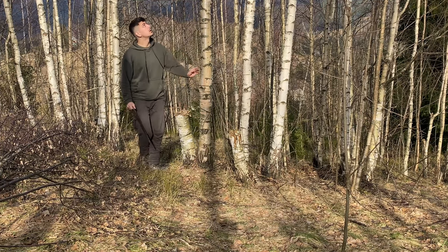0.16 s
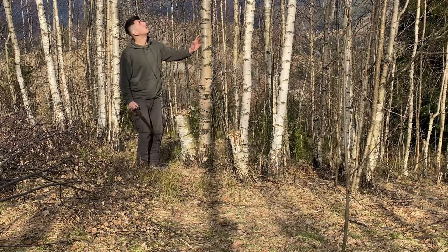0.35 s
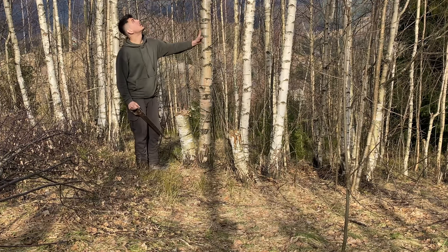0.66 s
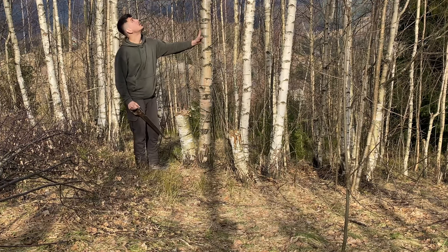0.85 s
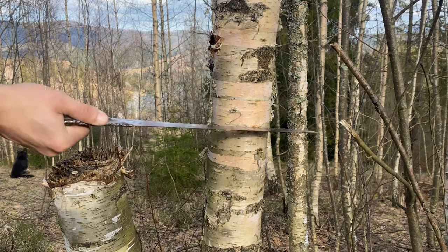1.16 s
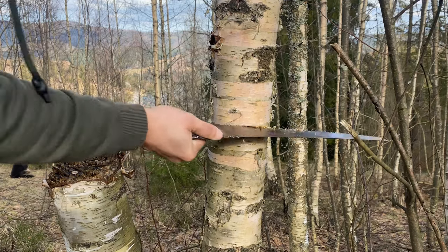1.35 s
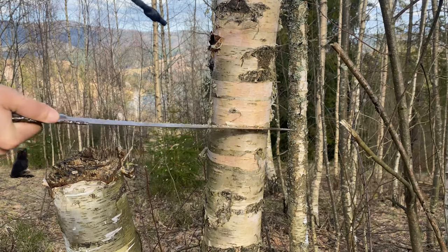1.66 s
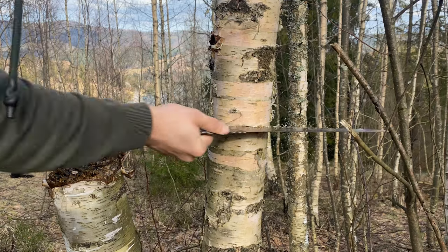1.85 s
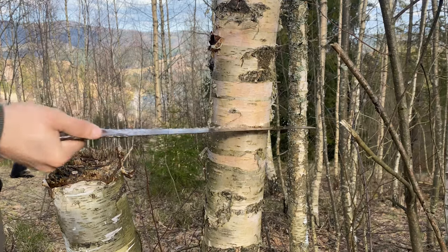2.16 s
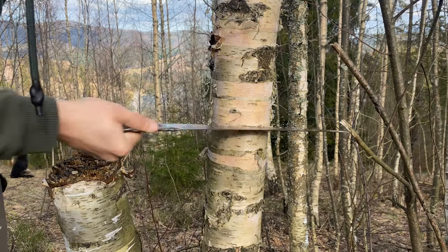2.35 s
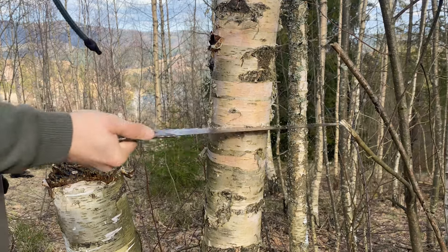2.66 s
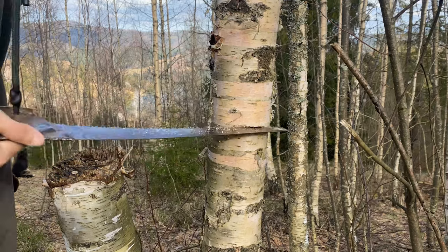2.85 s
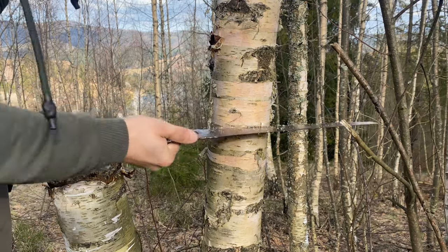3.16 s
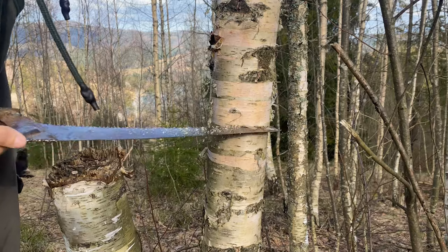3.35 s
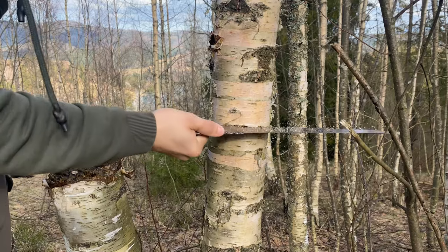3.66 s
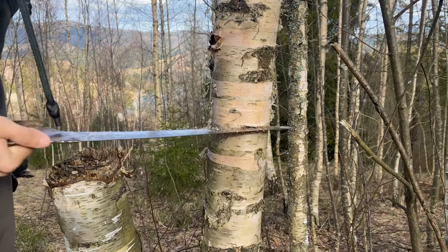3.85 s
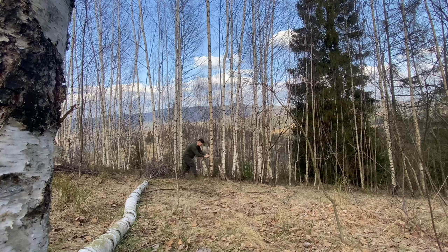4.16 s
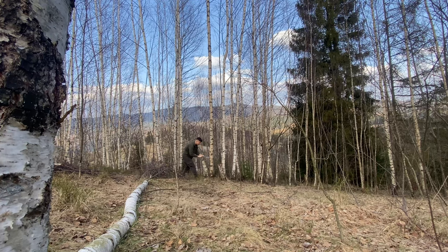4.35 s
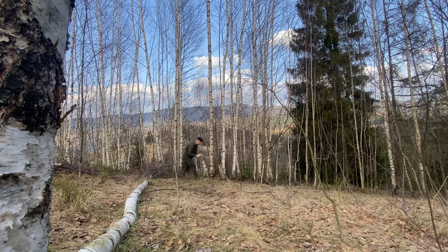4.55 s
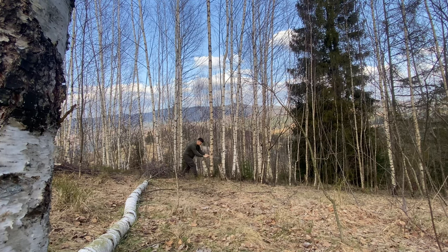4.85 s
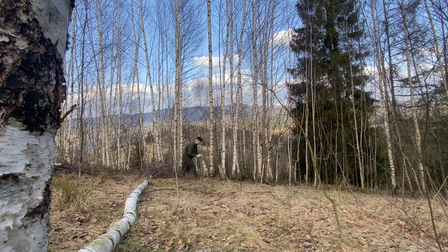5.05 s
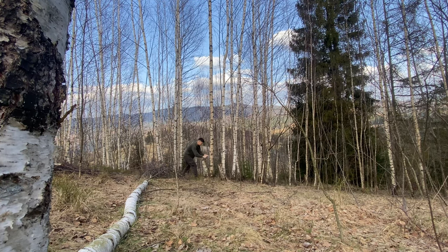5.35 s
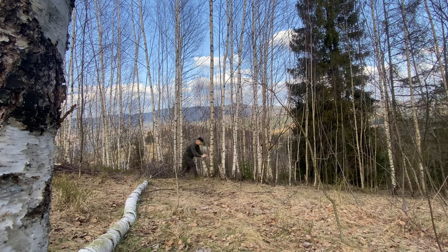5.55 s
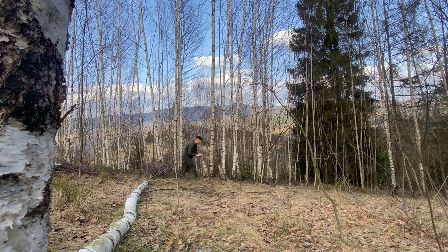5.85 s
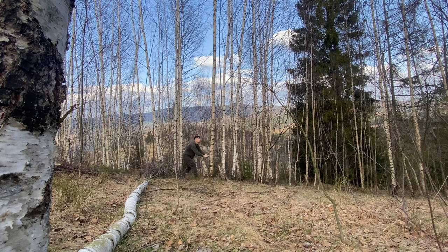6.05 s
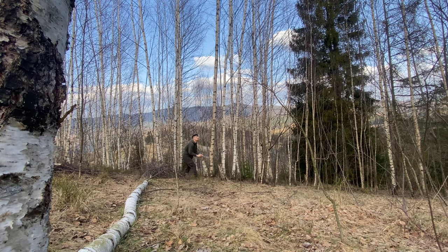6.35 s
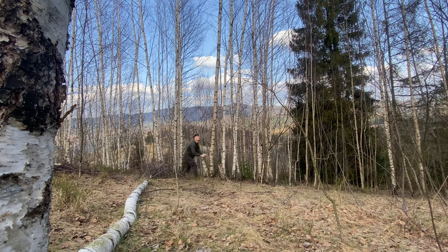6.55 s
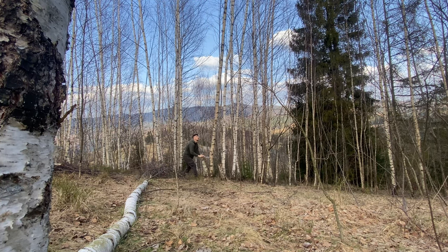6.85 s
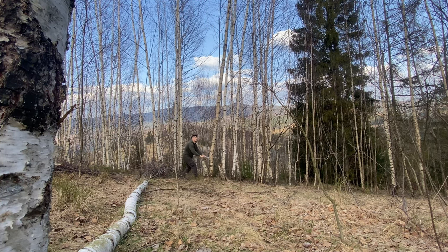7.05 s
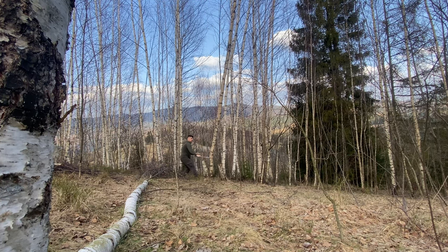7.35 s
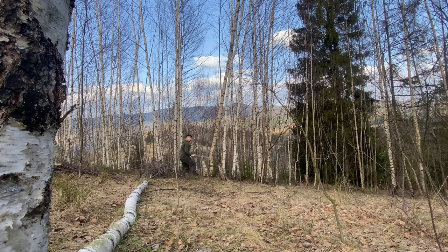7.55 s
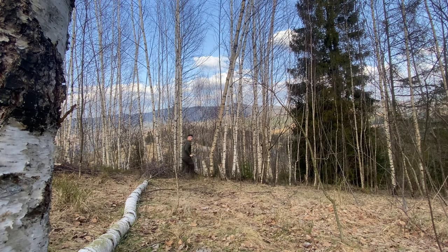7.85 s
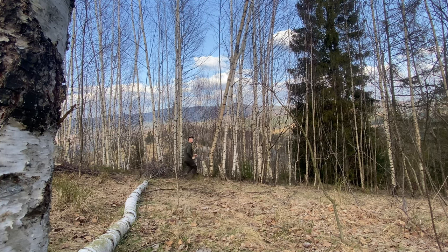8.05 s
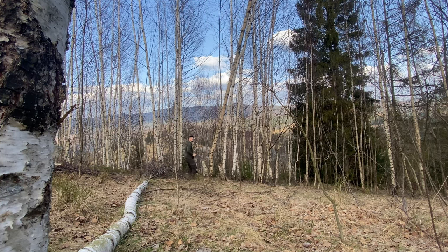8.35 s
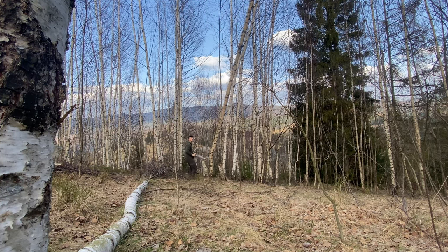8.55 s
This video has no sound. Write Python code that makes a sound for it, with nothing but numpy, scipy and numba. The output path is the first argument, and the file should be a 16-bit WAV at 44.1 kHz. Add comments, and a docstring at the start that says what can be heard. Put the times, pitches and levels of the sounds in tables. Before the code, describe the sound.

In quiet woods, a single step crunches dry leaves. Then a hand saw cuts a birch trunk close to the microphone in quick, hissing push and pull strokes, with small blade twangs and a low shudder in the trunk. After a dull knock, the sawing continues much fainter, from far off, with sharp cracks of wood. It stops, and branches rustle softly and snap as the tree leans over. Faint wind lies underneath.

```python
"""In quiet woods, a foot steps in dry leaves and a hand saw works through a birch trunk.
The saw is heard close by, then from far off. Its teeth bite in thousands of tiny clicks that
ring the blade, and each stroke shakes the trunk. The wood cracks, and the treetop rustles as
it topples. Faint wind lies under it all, and two microphone openings hear it in stereo."""
import sys
import numpy as np
from scipy import signal
from scipy.fft import rfft, irfft, next_fast_len
from scipy.io import wavfile
from numba import njit

SR = 44100
rng = np.random.default_rng(int(sys.argv[2]) if len(sys.argv) > 2 else 0)


def master(y):
    """Save y as 16-bit WAV."""
    cut = np.clip(np.atleast_2d(y).T, -1, 1)
    pcm = np.round(cut * 32767)  # scale
    wavfile.write(sys.argv[1], SR, pcm.astype(np.int16))


N = 384111
START_S, SCENE_CHANGE_S = .93, 3.925   # sawing begins; the scene changes to the saw heard far off
GRID = next_fast_len(N + SR)   # padded length for filtering
HZ = np.maximum(np.arange(GRID // 2 + 1) * SR / GRID, 1)

# deep tones of the trunk: (pitch [Hz], level [dB], time to fade by 60 dB [s])
TRUNK = [(64, 12, 0.21), (174, 6, 0.117), (239, 3.5, 0.055)]
# tone colour of distant teeth and splitting wood: (pitch [Hz], relative level [dB])
FAR_HISS = [(1500, -53), (3500, -3), (4800, -1), (5800, -3), (6700, 2), (8800, -2), (11000, -2),
            (13200, -10.5), (15800, -22.5)]
# tone colour of snapping branches: (pitch [Hz], relative level [dB])
BRANCHES = [(300, -14.5), (800, -16), (1500, -6), (2500, -2.5), (3300, -4.5), (4800, -6), (5500, -5.5),
            (8000, -21)]


def saw(close):
    """Teeth cut with each stroke and sometimes catch; the blade rings and the trunk trembles."""
    # teeth catching: (time [s], relative level [dB])
    snag_rows = [(0.956, -32.5), (0.9708, -24.5), (1.1413, -33), (1.1887, -51), (1.2103, -24),
                 (1.7397, -18.5), (1.9195, -38), (2.0085, -30.5), (2.133, -25), (2.156, -20.5),
                 (2.2997, -22.5), (2.317, -17), (2.356, -19), (2.5494, -29.5), (2.7272, -24),
                 (3.102, -34.5), (3.1507, -22.5), (3.2919, -18), (3.453, -17.5), (3.5944, -47.5),
                 (3.6905, -37), (3.8445, -14)]
    # tone colours of hissing teeth and tearing wood: (pitch [Hz], relative level [dB])
    near_hiss = [(1500, -42.5), (3500, -7), (4800, -4), (5800, -8), (7000, -1.5), (8600, 0.5), (9800, -1),
                 (11300, -1), (12600, -6), (15800, -14.5)]
    near_wood = [(90, -27), (210, -6), (320, -10), (560, -6), (750, -13.5), (1200, -2.5), (2050, -2),
                 (3000, 5), (4500, 0.5), (8000, -63.5)]
    far_wood = [(300, -28.5), (700, -24), (1300, -9.5), (2100, 3), (3000, 3.5), (4500, -24), (8000, -66)]
    times, db = np.transpose(snag_rows)
    snags = bursts(times, db - 13, fade_s=.04)
    hiss_fade_s = .063
    begun = linger(1. * (np.arange(N) >= START_S * SR), hiss_fade_s)
    turning = from_db(-58.5 + 4.5 * drift(60))   # the blade turning round unevenly in the cut
    near_gain = strokes("hiss", near=True, power=2.275, fade_s=hiss_fade_s) + turning
    far_gain = strokes("hiss", near=False, power=3.66, fade_s=hiss_fade_s) + from_db(-76)
    near = teeth(near_gain, near_hiss, near_wood, tear_slope=.82, snags=snags) * close * begun
    far = teeth(far_gain, FAR_HISS, far_wood, tear_slope=.93) * ~close
    bites = patchy(near + far, depth_db=2.5, rate_hz=18.8)
    ringing = blade(bites, close, bend=.0081, grip_db=6) * from_db(np.where(close, -5.5, -10.5))
    return bites + ringing + trembling(close, begun)


def strokes(sound, near, power, fade_s):
    """Loudness of the "hiss" or "shake": it grows as the arm's speed, raised to a power."""
    # pushes and pulls in turn: (start [s], length [s], place of top speed [0-1], hiss [dB], shake [dB])
    stroke_rows = [(0.931, 0.23, 0.12, -52.5, -51), (1.14, 0.24, 0.58, -26, -43),
                   (1.384, 0.33, 0.43, -31, -51.5), (1.696, 0.2, 0.8, -24, -44),
                   (1.956, 0.33, .45, -31.5, -54), (2.262, 0.19, 0.71, -24, -43),
                   (2.52, 0.34, 0.39, -31, -53), (2.83, 0.21, 0.6, -24, -45),
                   (3.092, 0.31, 0.31, -29.5, -57), (3.384, 0.2, 0.77, -23.5, -44),
                   (3.642, 0.32, 0.49, -31, -58), (3.926, 0.29, 0.25, -47, -66),
                   (4.188, 0.4, 0.25, -54, -70), (4.558, 0.29, 0.39, -46.5, -65),
                   (4.816, 0.43, 0.26, -53, -70.5), (5.223, 0.28, 0.41, -47, -64),
                   (5.489, 0.34, .35, -54, -67.5), (5.855, 0.29, 0.41, -47.5, -61),
                   (6.097, 0.38, 0.19, -53.5, -65.5), (6.441, 0.33, 0.39, -48, -62),
                   (6.702, 0.33, 0.32, -52, -62.5), (6.953, 0.22, 0.45, -52.5, -74.5)]
    out = np.zeros(N)
    for k, (start, length, peak, hiss_db, shake_db) in enumerate(stroke_rows):
        if (start < SCENE_CHANGE_S) == near:
            progress = np.arange(round(length * SR)) / (length * SR)
            speed = np.sin(np.interp(progress, [0, peak, 1], [0, np.pi / 2, np.pi]))
            full_load = .89 if k % 2 else .94   # share of top speed for a full bite: pull, push
            load = np.minimum(speed / full_load, 1) ** power
            at = round(start * SR)
            out[at:at + len(load)] += from_db(hiss_db if sound == "hiss" else shake_db) * load
    return linger(out, fade_s)


def teeth(gain, hiss_colour, wood_colour, tear_slope, snags=0):
    """Tooth bites hiss and wood fibres tear in coarser clumps; both throb as the blade chatters."""
    throb = from_db(drift(260) + .5 * drift(48))
    hiss = rms_one(colour(grains(14000, spread_db=2) * throb, hiss_colour))
    crunch = grains(4000, spread_db=1) * throb * from_db(1.23 * drift(50))
    tearing = rms_one(colour(crunch, wood_colour))
    tear_db = -48.5 + tear_slope * (20 * np.log10(gain) + 40)   # swells less steeply than the hiss
    return hiss * (gain + snags) + tearing * (from_db(tear_db) + from_db(-22) * snags)


def blade(bites, close, bend, grip_db):
    """As the blade slides through the cut, each of its tones wanders in pitch and strength."""
    # tones of the blade: (pitch [Hz], relative level [dB], time to fade by 60 dB [s])
    blade_tones = [(990, 1, 0.019), (1240, -14, 0.062), (2095, -4, 0.062), (2250, 6.5, 0.0053),
                   (2763, -5.5, 0.021), (3065, -13.5, 0.075), (3530, -5, 0.0087), (3937, -6.5, 0.012),
                   (4970, -4.5, 0.017), (5330, -8, 0.022), (5826, -6.5, 0.039), (6680, -5, 0.021),
                   (7305, -3.5, 0.017)]
    same_place = close == np.roll(close, 2)   # the ringing stops when the scene changes
    out = 0
    for hz, db, fade_s in blade_tones:
        angle = 2 * np.pi * hz / SR * (1 + bend * drift(6.1))
        decay = from_db(-60 / (fade_s * SR)) * same_place
        drive = bites * from_db(db + grip_db * drift(22))
        out = out + bending_tone(drive + 1e-18, decay, angle)
    return rms_one(out) * np.sqrt(np.mean(bites ** 2))


@njit
def bending_tone(x, decay, angle):
    """One ringing tone whose pitch and fading can change at every sample."""
    out = np.zeros_like(x)
    for c in range(x.shape[0]):
        for i in range(2, x.shape[1]):
            swing = 2 * decay[i] * np.cos(angle[i]) * out[c, i - 1] - decay[i] ** 2 * out[c, i - 2]
            out[c, i] = np.sin(angle[i]) * x[c, i - 1] + swing
    return out


def trembling(close, begun):
    """Trunk and ground shake with each stroke; close by, the trunk's own tones boom along."""
    # tone colours of the shaking: (pitch [Hz], relative level [dB])
    near_shake = [(25, -24), (45, -31), (66, 5), (95, -5.5), (125, -4.5), (220, -6.5), (320, -17),
                  (600, -24.5)]
    far_shake = [(25, -40), (45, -22), (66, 1.5), (95, 1), (125, -4.5), (220, -3), (300, -8.5), (400, -24),
                 (600, -37.5)]
    noise = rng.standard_normal((2, N))
    near_gain = strokes("shake", near=True, power=3.23, fade_s=.24) + from_db(-63.5) * begun
    far_gain = strokes("shake", near=False, power=3.23, fade_s=.24)
    boom = ring(noise[::-1] * near_gain, TRUNK) * from_db(-8.5) / np.std(ring(noise[0], TRUNK))
    near = rms_one(colour(noise, near_shake)) * near_gain + boom
    far = rms_one(colour(noise, far_shake)) * far_gain
    return np.where(close, near, far)


def twangs():
    """The blade springs free at the end of a pull."""
    # flicks of the blade: (time [s], relative level [dB])
    flicks = [(1.885, -35.5), (2.425, -34), (2.99, -29.5), (3.555, -34)]
    # tones of the free blade: (pitch [Hz], level [dB], time to fade by 60 dB [s])
    twang_tones = [(1234, 3, 0.081), (958, -15.5, 0.12), (435, -20, 0.3)]
    return taps(flicks, twang_tones)


def short_knock():
    """A short, dull knock sounds just before the saw turns distant."""
    # tones of the knock: (pitch [Hz], level [dB], time to fade by 60 dB [s])
    knock_tones = [(610, 0, .035), (380, -5, .03), (950, -5, .02)]
    knock_s, knock_db = 3.9162, -33
    return taps([(knock_s, knock_db)], knock_tones)


def cracks():
    """Wood and twigs split sharply, with a splintering tail and a thump in the trunk."""
    # cracks: (time [s], relative level [dB], low part's offset [dB], thump's offset [dB])
    crack_rows = [(0.2423, -73, -20, -15), (0.5045, -58, -14, -25), (0.742, -76, 9, -8),
                  (3.9965, -47, 1.5, -31), (4.028, -40, 2, -34), (4.6812, -35, 1.5, -32),
                  (4.802, -45.5, 1, -42), (4.9708, -38.5, -17, -30), (5.3449, -22.5, 3.5, -25.5),
                  (5.9574, -20, 0.5, -32.5), (7.206, -63, 23, -30), (7.2414, -54, 4, -40),
                  (7.285, -55.5, 9, -35), (7.394, -43.5, -16, -48), (8.3646, -23.5, -13.5, -52),
                  (8.6528, -39.5, -22, -39)]
    times, db, low_db, thump_db = np.transpose(crack_rows)
    noises = rng.standard_normal((2, 2, N))
    out = taps(zip(times + .006, db + thump_db), TRUNK)
    for noise, level_db, points in zip(noises, (db, db + low_db), (FAR_HISS, BRANCHES)):
        split = bursts(times, level_db - 4, fade_s=.028)
        splinters = bursts(times + .0025, level_db - 20.5, fade_s=.32)
        filter_gain = np.std(colour(noises[0, 0], points))
        out += colour(noise * (split + splinters), points) / filter_gain
    return out


def treetop():
    """Branches and fine twigs rustle as the tree leans over."""
    # course of the toppling: (time [s], branches [dB], twigs [dB])
    topple = [(7.1, -70, -71), (7.23, -63, -56.5), (7.31, -60.5, -62), (7.526, -61.5, -67),
              (7.826, -61, -66.5), (8.086, -62.5, -61.5), (8.36, -61.5, -65), (8.552, -59, -61.5),
              (8.71, -60, -57)]
    # tone colour of fine twigs: (pitch [Hz], relative level [dB])
    twig_colour = [(3000, -13.5), (5500, -5), (6800, -0.5), (8500, 0.5), (10800, 3), (13000, -5),
                   (15800, -18)]
    times, *levels = np.transpose(topple)
    branch_db, twig_db = [np.interp(np.arange(N) / SR, times, db, left=-200, right=-200) for db in levels]
    branches = rustle(BRANCHES, per_s=5500) * from_db(branch_db)
    twigs = rustle(twig_colour, per_s=4000) * from_db(twig_db)
    return patchy(branches + twigs, depth_db=1.3, rate_hz=20)


def footstep():
    """A foot crushes dry leaves, which then settle; the heel thuds on the ground."""
    # leaves underfoot: (time [s], relative level [dB], time to fade by 60 dB [s])
    crunches = [(0.3, -39.5, 0.099), (0.36, -70.5, 0.59), (0.497, -63.5, 0.19)]
    # tone colour of dry leaves: (pitch [Hz], relative level [dB])
    leaf_colour = [(300, -8), (900, -11), (2500, -8.5), (4500, -5.5), (6000, -7), (8500, -6.5), (11000, -2),
                   (13200, -11), (15600, -33)]
    soften_s = np.log(1000) * .013   # rounds off the start of each crunch
    crush = linger(linger(bursts(*np.transpose(crunches)), soften_s), soften_s)
    stirring = from_db(-87) * (np.arange(N) < START_S * SR)
    heel_s, heel_db = .352, -70
    return rustle(leaf_colour, per_s=9000) * (crush + stirring) + taps([(heel_s, heel_db)], TRUNK)


def rustle(points, per_s):
    """Dry leaves and twigs make clumps of tiny snaps."""
    snaps = grains(per_s, spread_db=1.5) * from_db(.5 * drift(36))
    return rms_one(colour(snaps, points))


def wind():
    """Far wind fills the woods with a faint, steady rumble."""
    # tone colour of the air: (pitch [Hz], relative level [dB])
    air_colour = [(15, -20), (25, -25), (59, 0), (276, -19), (314, -18.5), (429, -20), (600, -23.5),
                  (682, -21.5), (12000, -48), (15600, -88.5), (22000, -120)]
    return from_db(-74.5) * rms_one(colour(rng.standard_normal((2, N)), air_colour))


def from_db(db):
    """Turn decibels into a plain multiplier."""
    return 10 ** (np.asarray(db) / 20)


def rms_one(x):
    """Scale a signal to an average strength (RMS) of 1."""
    return x / np.sqrt(np.mean(x ** 2) + 1e-20)


def drift(rate_hz):
    """A smooth random wobble with a typical size of 1."""
    r = np.exp(-2 * np.pi * rate_hz / SR)
    return rms_one(signal.lfilter([1], [1, -2 * r, r * r], rng.standard_normal(N + SR))[SR:])


def grains(per_s, spread_db):
    """Two separate streams of random clicks, mostly small and now and then large."""
    sizes = from_db(spread_db * np.minimum(rng.exponential(1, (2, N)), 5))
    signs = rng.choice([-1, 1], (2, N))
    return rms_one(sizes * signs * (rng.random((2, N)) < per_s / SR))


def bursts(times, dbs, fade_s):
    """A loudness curve that jumps up at each time, then falls 60 dB in fade_s."""
    out = np.zeros(N)
    for start, db, fade in np.broadcast(times, dbs, fade_s):
        at = round(start * SR)
        age = np.arange(min(N - at, SR // 2)) / SR
        out[at:at + len(age)] += from_db(db - 60 * age / fade)
    return out


def linger(x, fade_s):
    """Smooth a loudness curve so that it takes fade_s to fall 60 dB."""
    decay = from_db(-60 / (fade_s * SR))
    return signal.lfilter([1 - decay], [1, -decay], x)


def ring(x, tones):
    """An object rings with several fading tones when x shakes it."""
    out = 0
    for hz, db, fade_s in tones:
        decay, angle = from_db(-60 / (fade_s * SR)), 2 * np.pi * hz / SR
        feedback = [1, -2 * decay * np.cos(angle), decay ** 2]
        out = out + from_db(db) * signal.lfilter([0, np.sin(angle)], feedback, x + 1e-18)
    return out


def taps(rows, tones):
    """Short blows ring an object, mostly in the stream that left and right share."""
    blows = np.zeros(N)
    for time, db in rows:
        blows[round(time * SR)] = from_db(db)
    return ring(blows, tones) * [[1.3], [.4]]


def colour(x, points):
    """Give x a tone colour, using a minimum-phase filter so that nothing sounds early."""
    hz, db = np.transpose(points)
    log_gain = np.interp(np.log(HZ), np.log(hz), db) * np.log(10) / 20
    cepstrum = irfft(log_gain, GRID)
    cepstrum[1:GRID // 2] *= 2   # fold the late half onto the early half
    cepstrum[GRID // 2 + 1:] = 0
    return irfft(rfft(x, GRID) * np.exp(rfft(cepstrum)), GRID)[..., :N]


def patchy(x, depth_db, rate_hz):
    """Twelve overlapping pitch bands each swell and fade on their own."""
    place = np.interp(np.log(HZ), np.log(np.geomspace(500, 14000, 12)), np.arange(12))
    spectrum, out = rfft(x, GRID), 0
    for k in range(12):
        band = irfft(spectrum * np.clip(1 - abs(place - k), 0, 1), GRID)[:, :N]
        out = out + band * from_db(depth_db * drift(rate_hz))
    return out


def stereo(pair, rows):
    """Mix a shared and an unshared stream into left and right, differently at each pitch."""
    hz, *columns = np.transpose(rows)
    alike, lead, balance_db = [np.interp(HZ, hz, column) for column in columns]
    alike = np.clip(alike, 0, 1)
    shared, own = rfft(pair, GRID) * np.sqrt([(1 + alike) / 2, (1 - alike) / 2])
    tilt = from_db(balance_db / 2) * np.exp(-.5j * lead)
    return irfft([(shared + own) * tilt, (shared - own) / tilt], GRID)[:, :N]


def scene():
    """The close saw gets one stereo image; the far saw and the woods share another."""
    # how the two microphone openings hear each place:
    # (pitch [Hz], likeness [0-1], right side's lead [radians], left minus right [dB])
    near_image = [(100, .92, 0, -1), (450, .75, -.1, -4), (900, .75, -1, 1), (1500, .4, -2.6, 1),
                  (3000, .4, -2.3, 0), (4800, .1, -3.4, 1.3), (6500, .6, -6, -2.5), (7400, .15, -6.4, -4),
                  (8000, .65, -3.4, -1), (9200, .6, -3, 1.2), (10300, .9, -.3, -1), (11300, .97, .1, -.4),
                  (12400, .8, 1.7, -.3), (13150, 1, np.pi, 0), (13750, 1, np.pi, 0), (14500, .65, 4.3, 0),
                  (15400, .97, 2 * np.pi, 0)]
    far_image = [(100, .7, 0, -2), (600, .3, -1.7, -2), (1500, .6, -.4, 1), (2300, .88, -.3, -1),
                 (4000, .2, -1.1, 0), (5100, .4, -1.5, .6), (5700, .55, -3.4, -.4), (6400, .6, -6.2, -1),
                 (7200, .6, -7, -2), (7900, .5, -9.4, -2), (8400, .2, -11.5, -3), (9300, .45, -9.6, -4.5),
                 (10200, .65, -6.2, -4), (11300, .92, -6.1, -2.5), (12400, .75, -4.6, -.3),
                 (13000, 1, -np.pi, 0), (13800, 1, -np.pi, 0), (14600, .4, -1.9, -.3), (15400, .97, 0, 0)]
    close = np.arange(N) < SCENE_CHANGE_S * SR
    sawing = saw(close)
    near = (sawing + twangs() + short_knock()) * close
    far = sawing * ~close + treetop() + wind() + cracks() + footstep()
    return stereo(near, near_image) + stereo(far, far_image)


def record(dry):
    """The microphone loses the deepest bass, and the highest treble is cut."""
    bass_cut = signal.butter(2, 47, "high", fs=SR, output="sos")
    treble_cut = signal.cheby2(22, 65, 16400, fs=SR, output="sos")
    return signal.sosfilt(treble_cut, signal.sosfilt(bass_cut, dry))


dry = scene()
out = record(dry)
master(out)
```